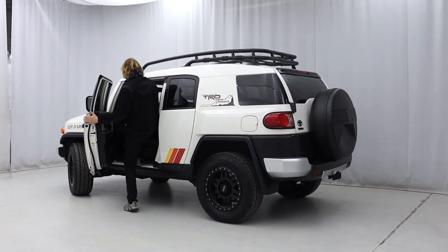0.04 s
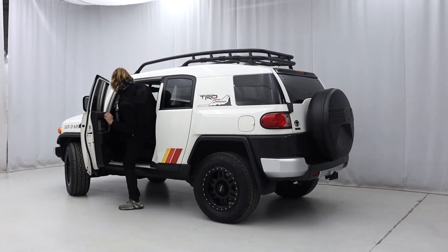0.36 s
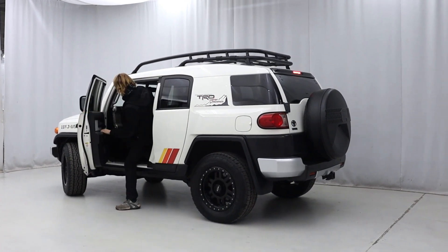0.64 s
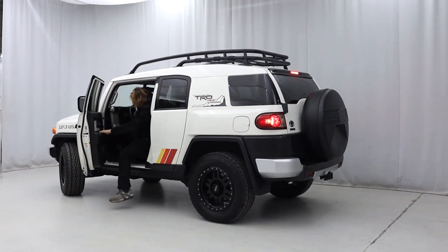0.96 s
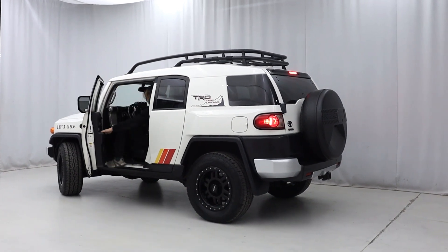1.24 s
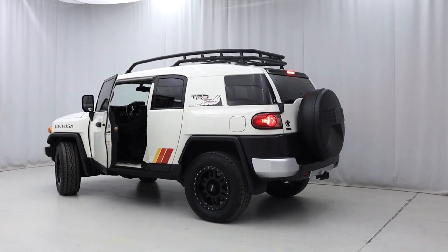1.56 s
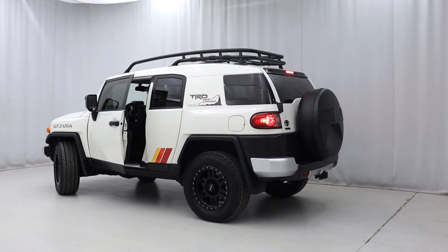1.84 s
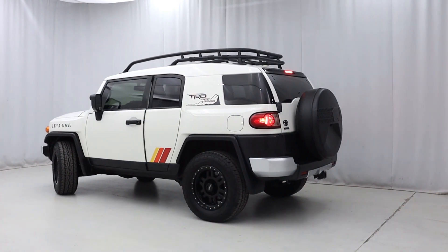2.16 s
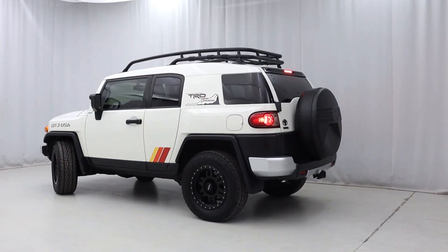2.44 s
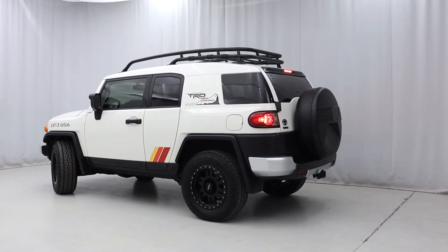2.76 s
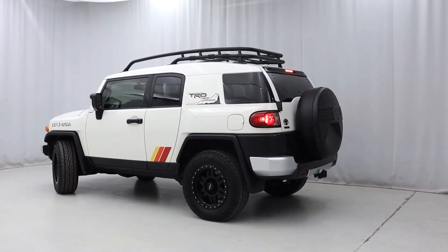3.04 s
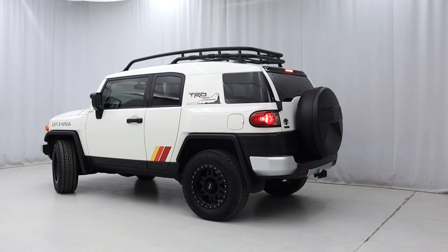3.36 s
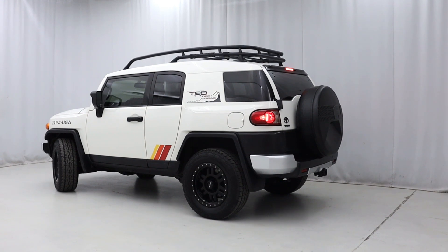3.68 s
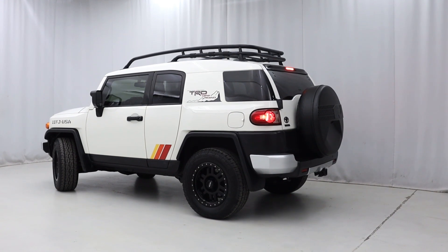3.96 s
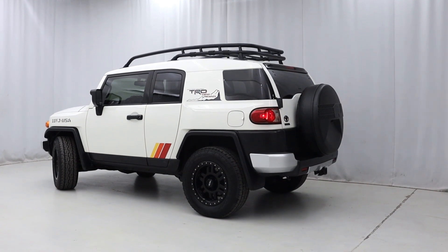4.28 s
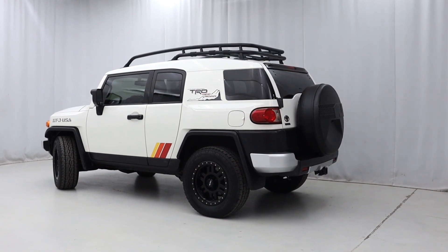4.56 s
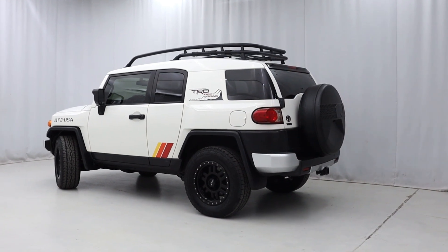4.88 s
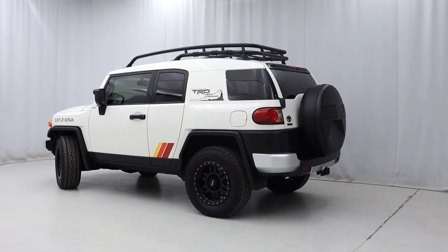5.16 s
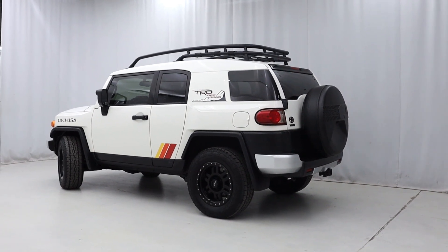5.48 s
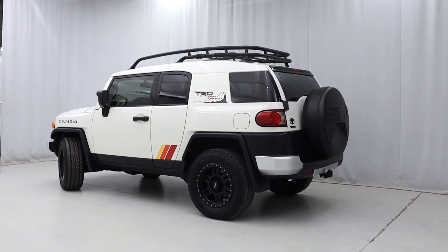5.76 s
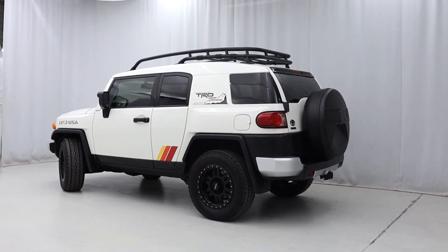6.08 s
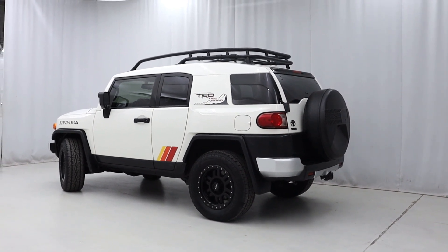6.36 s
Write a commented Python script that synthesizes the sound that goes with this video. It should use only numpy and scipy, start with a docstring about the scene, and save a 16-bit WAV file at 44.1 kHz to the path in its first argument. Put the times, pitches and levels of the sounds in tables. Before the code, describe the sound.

An SUV door slams in a large hall, then the starter cranks and the engine catches, flares and settles into a fast idle.

```python
"""Ventilation rumbles in a large hall. A driver slides onto an SUV's seat, keys jingle, the door slams.
A solenoid clacks the pinion in; the starter's gears grind, slowed by each compression stroke.
The V6 catches with exhaust thumps and overruns the whirring freewheel; the pipe hoots at resonance
and the pinion is thrown out. The engine flares in clean tones, then settles to a fast cold idle
whose exhaust grows raspier as it takes up load."""
import sys
import numpy as np
from scipy import signal
from scipy.fft import rfft, irfft, next_fast_len
from scipy.io import wavfile

SR = 44100
rng = np.random.default_rng(int(sys.argv[2]) if len(sys.argv) > 2 else 0)


def wav_record(signal):
    """Record a signal, one row per channel, as 16-bit PCM in the file named by sys.argv[1]."""
    frames = np.transpose(np.atleast_2d(signal))
    bounded = np.clip(frames, -1, 1)
    # unit amplitude maps onto the largest positive 16-bit level
    quanta = np.round(bounded * 32767).astype(np.int16)
    wavfile.write(sys.argv[1], SR, quanta)


N = 283122
TIME = np.arange(N) / SR
HZ = np.maximum(np.fft.rfftfreq(next_fast_len(N + SR // 4, True), 1 / SR), 1)

# engine speed as the firing rate of one cylinder bank: time_s, rate_hz
BANK_RATE = [(3.63, 18.7), (3.7, 25.3), (3.8, 31.3), (3.88, 37), (3.96, 39.4), (4.06, 40.4), (4.3, 39.6),
             (4.65, 37.3), (5.98, 37.4), (6.2, 38.3)]
ENGAGE_S, CATCH_S, RELEASE_S = 2.886, 3.592, 3.9   # starter in, first firing, starter out


def from_db(db):
    """Decibels to gain."""
    return 10 ** (np.asarray(db) / 20)


def rms_one(x):
    """Scale to unit power."""
    return x / np.sqrt(np.mean(x ** 2) + 1e-20)


def fade(start_s, end_s):
    """Ramp from 0 to 1."""
    return np.clip((TIME - start_s) / max(end_s - start_s, 1e-3), 0, 1)


def since(start_s):
    """Seconds since a moment, 0 before it."""
    return np.maximum(TIME - start_s, 0)


def at_hz(points):
    """Read a table along log frequency."""
    hz, value = np.transpose(points)
    return np.interp(np.log(HZ), np.log(hz), value)


def filtered(x, gain):
    """Apply a gain per frequency."""
    return irfft(rfft(x, 2 * (len(HZ) - 1)) * gain)[..., :N]


def colour(x, spectrum):
    """Shape x by rows of freq_hz, level_db, with steep skirts; rms 1."""
    skirts = np.minimum(1, np.minimum(HZ / spectrum[0][0], spectrum[-1][0] / HZ)) ** 4
    return rms_one(filtered(x, from_db(at_hz(spectrum)) * skirts))


def noise():
    """White noise."""
    return rng.standard_normal(N)


def drift(rate_hz):
    """Random wander; rms 1."""
    knots = rng.standard_normal(4000)
    return rms_one(np.interp(TIME * rate_hz, np.arange(len(knots)), knots))


def harmonic(cycles, multiple):
    """Sine at a multiple of a cycle count, in random phase."""
    return np.sin(2 * np.pi * (multiple * cycles + rng.random()))


def resonate(x, hz, width_hz):
    """One resonance, peak gain 1."""
    r = np.exp(-np.pi * width_hz / SR)
    poles = [1, -2 * r * np.cos(2 * np.pi * hz / SR), r * r]
    return signal.lfilter(np.array([1, 0, -1]) * (1 - r * r) / 2, poles, x + 1e-18)


def ticks(cycles, spread_db):
    """One click of uneven strength per cycle."""
    return np.diff(np.floor(cycles), prepend=0) * from_db(spread_db * rng.uniform(-1, 1, N))


def struck(times_s, levels_db, t60_s):
    """Envelope that jumps at each time and dies away."""
    clicks = np.zeros(N)
    clicks[(np.asarray(times_s) * SR).astype(int)] = from_db(levels_db)
    return signal.lfilter([1], [1, -from_db(-60 / (t60_s * SR))], clicks + 1e-18)


def diffuse(mid, side):
    """Two unrelated signals as sound from all around: left and right alike in the bass only."""
    # left-right likeness: freq_hz, correlation
    likeness = [(100, 0.99), (250, 0.97), (500, 0.83), (1000, 0.33), (2000, 0), (15000, 0)]
    alike = np.clip(at_hz(likeness), -1, 1)
    common = filtered(mid, np.sqrt(1 + alike))
    opposed = filtered(side, np.sqrt(1 - alike)) * [[1], [-1]]
    return (common + opposed) / np.sqrt(2)


def hall(x, early_db, late_db, early_t60_s=0.091, late_t60_s=0.64, lag_samples=2.76, wall_hz=6000):
    """Direct sound from slightly left, quick floor and body reflections, a dull long tail."""
    early = [rms_one(noise() * from_db(-60 * TIME / early_t60_s)) for ear in "LR"]
    late = [rms_one(noise() * from_db(-60 * TIME / late_t60_s) * fade(.01, .03)) for ear in "LR"]
    late = signal.lfilter(*signal.butter(1, wall_hz, fs=SR), late)
    echoes = diffuse(*(from_db(early_db) * np.array(early) + from_db(late_db) * late))
    direct = np.array([x, filtered(x, np.exp(-2j * np.pi * HZ / SR * lag_samples))])
    return direct + signal.fftconvolve([x], echoes[:, :SR] / np.sqrt(N), axes=1)[:, :N]


def ventilation(hiss_db=-57, hiss_fall_db_per_s=4, hiss_end_s=1.6):
    """Steady duct rumble with a wavering hum; a thin high hiss sinks, then cuts off."""
    # duct air and hiss spectra: freq_hz, level_db
    duct_spectrum = [(15, -43), (25, -33), (45, -6.5), (135, -1.5), (160, -5.5), (190, -5.5), (331, -2),
                     (401, -10), (431, -9), (576, -9.5), (848, -9.5), (957, -13.5), (1410, -15.5),
                     (3790, -28), (8000, -43.5), (10400, -70), (17600, -120)]
    hiss_spectrum = [(7000, -9), (9500, -0.5), (10600, 0), (11500, 2), (12300, -11), (15800, -13)]
    air = from_db(-33.5) * diffuse(colour(noise(), duct_spectrum), colour(noise(), duct_spectrum))
    hum = from_db(-40.5) * rms_one(resonate(noise(), hz=163.7, width_hz=8.9))
    hiss_gain = from_db(hiss_db - hiss_fall_db_per_s * TIME) * (1 - fade(hiss_end_s, hiss_end_s))
    hiss = hiss_gain * np.array([colour(noise(), hiss_spectrum) for ear in "LR"])
    return air + hum + hiss + from_db(-60) * rng.standard_normal((2, N))


def driver(jingle_s=(1.25, 1.56), touches_per_s=45, touch_db=-41):
    """Clothes slide over the seat, keys jingle at the ignition and trim is knocked."""
    # cloth and key spectra: freq_hz, level_db
    cloth_spectrum = [(2500, -5), (5000, 0), (7000, -8), (15000, -21)]
    key_spectrum = [(2350, -43), (4000, -3), (8020, 3), (8890, -1), (11100, 4), (12800, -3), (15100, 0),
                    (15800, -4)]
    # loudest key hits and trim knocks: start_s, relative_db
    key_hits = [(1.274, -38), (1.3543, -38), (1.3848, -34), (1.431, -24.5), (1.5255, -27), (1.5743, -35),
                (1.8442, -36), (1.9969, -36.5)]
    trim_knocks = [(1.528, -37), (1.572, -32), (1.851, -36.5), (1.998, -46)]
    touches_s = np.arange(*jingle_s, 1 / touches_per_s)
    jitter, spread = rng.standard_normal((100, 2))[:len(touches_s)].T
    touches = np.transpose([touches_s + 0.34 * jitter / touches_per_s, touch_db + 2.1 * spread])
    times_s, levels_db = np.vstack([key_hits, touches]).T
    jingle = from_db(3.1 * drift(250))   # keys on the ring touch several times
    keys = colour(noise(), key_spectrum) * jingle * struck(times_s, levels_db - 8.5, t60_s=0.054)
    trim_spectrum = [(120, 10), (500, -8), (1500, -5), (4000, -14.5), (7000, -25)]
    knocks = colour(noise(), trim_spectrum) * struck(*np.transpose(trim_knocks), t60_s=0.056)
    sliding = fade(0.1, 0.17) * (1 - fade(0.29, .36))
    return from_db(-49.5) * sliding * colour(noise(), cloth_spectrum) + keys + knocks


def blows(rows, mismatch_db_per_part=16.5):
    """Soft blows thud in the low parts, hard ones clack and snap in the high parts."""
    # parts that a blow rings: low_hz, high_hz, t60_s
    parts = [(125, 277, 0.19), (380, 1270, 0.087), (1240, 4300, 0.08), (4460, 9700, 0.073)]
    times_s, blow_db, hardness = np.transpose(rows)
    out = 0
    for k, (low_hz, high_hz, t60_s) in enumerate(parts):
        level_db = blow_db - mismatch_db_per_part * np.abs(hardness * (len(parts) - 1) - k)
        band = signal.butter(2, [low_hz, high_hz], "band", fs=SR, output="sos")
        rattle = noise() * struck(times_s, level_db, t60_s) * np.sqrt(SR / 2 / (high_hz - low_hz))
        out = out + from_db(-6.5) * signal.sosfilt(band, rattle)
    return out


def door_slam(skin_db=-7, hard_loss_db=35):
    """Latch, seal and frame are met in turn; the soft blows also ring the door skin."""
    # door contacts: start_s, level_db, hardness (0-1)
    contacts = [(2.2702, -9.5, 0.81), (2.2707, -14, 0.25), (2.283, -15, .35), (2.304, -5, 0.32),
                (2.312, -15, 0), (2.326, -11, 0.2), (2.334, -5.5, 0.69), (2.344, -13.5, 0.15),
                (2.384, -19.5, 0.08)]
    # skin modes: pitch_hz, width_hz, level_db
    skin_modes = [(133, 22, -3), (245, 34, 2)]
    age_s = TIME[:SR // 4]
    ring = sum(from_db(db) * np.exp(-np.pi * width_hz * age_s) * np.sin(2 * np.pi * hz * age_s)
               for hz, width_hz, db in skin_modes)
    out = blows(contacts)
    for start_s, blow_db, hardness in contacts:
        out[int(start_s * SR):][:len(ring)] += from_db(blow_db + skin_db - hard_loss_db * hardness) * ring
    return out


def solenoid(ring_db=-18, ring_t60_s=0.15):
    """The plunger throws the pinion in, later out, with clacks that ring the bell housing."""
    # plunger clacks: start_s, level_db, hardness (0-1)
    clacks = [(2.882, -19.5, 0.6), (2.889, -2.5, 0.83), (3.893, -20, .72)]
    # bell housing modes: pitch_hz, width_hz, level_db
    bell_modes = [(1550, 87, 2.5), (4290, 410, 3.5)]
    times_s, blow_db, _ = np.transpose(clacks)
    jolt = noise() * struck(times_s, blow_db + ring_db, ring_t60_s)
    ring = sum(from_db(db) * resonate(jolt, hz, width_hz) * np.sqrt(SR / (np.pi * width_hz))
               for hz, width_hz, db in bell_modes)
    return blows(clacks) + ring


def starter_load(jerk_db=-22, stroke_fall_db=14.5, gears_db=-31, unload_db_per_s=49):
    """Gear force: a jerk from rest, a swell per compression, unloading once the engine fires."""
    # compression strokes: start_s, rise_s, hold_s, level_db
    strokes = [(2.935, 0.051, .025, -20.5), (3.044, 0.042, 0.054, -18), (3.252, .008, .038, -16.5),
               (3.382, .006, .034, -17), (3.489, .005, .03, -17.5)]
    jerk = struck([ENGAGE_S], [jerk_db], t60_s=0.6)
    stroke_power = 0
    for start_s, rise_s, hold_s, db in strokes:
        lengths_past = since(start_s + rise_s + hold_s) / (rise_s + hold_s)
        stroke_power += (fade(start_s, start_s + rise_s) * from_db(db - stroke_fall_db * lengths_past)) ** 2
    engaged = fade(ENGAGE_S, ENGAGE_S + .01) * (1 - fade(RELEASE_S, RELEASE_S + 0.046))
    running = engaged * from_db(gears_db - unload_db_per_s * since(CATCH_S))
    return np.sqrt(jerk ** 2 + stroke_power + running ** 2)


def starter(free_mesh_hz=441.3, spin_up_s=0.03, sag_share=0.45, sag_lag_s=0.03, housing_db=-6):
    """Pinion teeth grind on the ring gear, ring the housing and groan as the engine leaves rest."""
    # grind spectrum: freq_hz, level_db
    grind_spectrum = [(180, -15), (280, -4.5), (335, 1), (385, -9.5), (432, -1), (563, -8), (759, -4),
                      (1230, -2), (1550, -4.5), (2420, -1), (3380, -5.5), (4480, -8.5), (8550, -20.5),
                      (15800, -37)]
    # starter and bell housing modes: pitch_hz, half_width_hz, level_db
    housing_modes = [(767, 10, 11.5), (960, 21, 3), (1540, 114, 4.5), (2100, 110, -3), (2350, 49, -10),
                     (3220, 26, -8), (3580, 53, -7), (4040, 28, -34), (4380, 310, -2.5), (5500, 390, -9)]
    # gear groan: mesh_multiple, level_db
    groan_tones = [(1, -17), (3, -4.5), (4, -12.5), (6, -9)]
    load = starter_load()
    # each compression slows the motor, a little late
    pole = np.exp(-1 / (sag_lag_s * SR))
    drag = signal.lfilter([1 - pole], [1, -pole], load / load.max())
    mesh_hz = free_mesh_hz * (1 - np.exp(-since(ENGAGE_S) / spin_up_s)) * (1 - sag_share * drag)
    mesh_cycles = np.cumsum(mesh_hz) / SR
    landings = np.cumsum(mesh_hz * np.exp(.4 * drift(600))) / SR   # backlash: teeth land early or late
    teeth = rms_one(ticks(landings, spread_db=3)) + 1.5 * noise()
    ring = sum(from_db(db) * resonate(teeth, hz, 2 * half_hz) for hz, half_hz, db in housing_modes)
    grind = rms_one(colour(teeth, grind_spectrum) + from_db(housing_db) * rms_one(ring))
    groan = sum(from_db(db) * (1 + .4 * drift(90)) * harmonic(mesh_cycles, k) for k, db in groan_tones)
    return load * (grind + (1 - fade(3.12, 3.22)) * groan)


def engine_load(start_s=3.99, time_constant_s=1.51):
    """Load on the cold engine, 0 to 1: quick at first, then levelling off."""
    return 1 - np.exp(-since(start_s) / time_constant_s)


def engine_bay(bank_cycles, base_db=-32.5, load_rise_db=9):
    """Valves and injectors tick through the rush of fan and belts."""
    # clatter spectrum: freq_hz, level_db
    clatter_spectrum = [(350, -23.5), (600, -1.5), (778, -5), (845, -10), (1040, -7), (1650, -8.5),
                        (1890, -11), (2200, -10.5), (2740, -18), (4670, -23.5), (7860, -34.5),
                        (15200, -43.5), (15800, -42)]
    valves = rms_one(ticks(bank_cycles * 8, spread_db=4))
    rush = noise() * (1 + 0.066 * np.cos(4 * np.pi * bank_cycles))
    gain = fade(3.1, 3.6) * from_db(base_db + load_rise_db * engine_load())
    return gain * colour(rush + 0.11 * valves, clatter_spectrum)


def freewheel(bank_cycles, teeth_per_cycle=88, fall_db_per_s=20, throw_out_db_per_s=239):
    """The engine overruns the starter: a surging, ringing whirr and a tooth whine that tracks speed."""
    # whirr spectrum: freq_hz, level_db
    whirr_spectrum = [(500, -1), (1200, -18), (2500, -2), (3600, 0), (4500, -1.5), (6000, -4.5),
                      (8500, -11), (15800, -20)]
    # freewheel modes: pitch_hz, width_hz, level_db
    modes = [(1516, 100, -7), (2460, 31, 3), (2790, 43, 1.5), (3130, 160, 0), (4340, 300, -3)]
    slip = noise() * (1 + 0.15 * np.cos(4 * np.pi * bank_cycles))
    ring = rms_one(sum(from_db(db) * resonate(slip, hz, width_hz) for hz, width_hz, db in modes))
    whine = fade(CATCH_S, 3.75) * drift(400) * np.sin(2 * np.pi * teeth_per_cycle * bank_cycles)
    whirr = colour(slip, whirr_spectrum) + from_db(-3) * ring + from_db(-1.5) * whine
    level_db = -26 - fall_db_per_s * since(CATCH_S) - throw_out_db_per_s * since(RELEASE_S)
    surge_db = 2 * drift(30)
    return fade(3.5, 3.599) * from_db(level_db + surge_db) * whirr


def exhaust_thumps(pulses, catch_db=-7, hold_s=0.14, fall_db_per_s=78):
    """Firings ring the pipe; the muffler rounds off the strongest and passes only the bass."""
    # pipe modes: pitch_hz, width_hz, level_db
    pipe_modes = [(110.2, 24.7, -1.5), (201.6, 41, -7), (256.6, 48, -7.5), (325, 36, -9)]
    pipe = sum((-1) ** k * from_db(db) * resonate(pulses, hz, width_hz)
               for k, (hz, width_hz, db) in enumerate(pipe_modes))
    muffler = signal.butter(2, [58, 350], "band", fs=SR, output="sos")
    # the first firings burn a full charge of air
    full_charge = from_db(catch_db - fall_db_per_s * since(CATCH_S + hold_s))
    idle_charge = from_db(-30 + 11.5 * engine_load())
    return (full_charge + idle_charge) * signal.sosfilt(muffler, np.tanh(.55 * rms_one(pipe)))


def exhaust(bank_cycles, flare_s=(3.78, 3.91), settle_s=(4.24, 4.54)):
    """Uneven firings thump, merge into clean tones in the flare and rasp at idle; returns bass, rasp."""
    # cylinder strengths in firing order: level_db
    cylinder_db = [3.65, 6.4, 5.6, 4.8, 2.9, 6.3]
    # exhaust tones: bank_multiple, flare_db, idle_db
    tone_levels = [(1, -45.5, -24), (2, -11.5, -15.5), (3, 0, -5), (4, -1, -9), (5, -4, -21.5),
                   (7, -7, -10), (8, -13.5, -16)]
    # gas rasp spectrum: freq_hz, level_db
    rasp_spectrum = [(90, -42), (130, 3.5), (190, 1), (245, 0), (280, 4.5), (360, 3), (400, -2), (455, -2),
                     (520, -11.5), (640, -17.5), (850, -30.5), (1500, -60)]
    load, idling = engine_load(), fade(*settle_s)
    firings = 2 * bank_cycles
    strength = from_db(cylinder_db)[firings.astype(int) % len(cylinder_db)]
    pulses = ticks(firings, spread_db=2.5) * strength
    tones = 0
    for k, flare_db, idle_db in tone_levels:
        level_db = flare_db + (idle_db - flare_db) * idling + 1.97 * drift(16)
        tones += from_db(level_db) * harmonic(bank_cycles, k)
    tones *= fade(*flare_s) * from_db(-16 * (1 - idling) + (-23.5 + 7.5 * load) * idling)
    # gas rushes out in a puff after each firing, swelling unevenly
    puffs = strength * (1.06 + np.exp(-4 * (firings % 1))) * from_db(0.96 * drift(22))
    rasp = colour(noise() * puffs + 0.28 * rms_one(pulses), rasp_spectrum) * from_db(-26 + 11.5 * load)
    running = fade(CATCH_S - .015, CATCH_S + 0.032)
    return running * (exhaust_thumps(pulses) + tones), running * rasp


def pipe_boom(bank_hz, bank_cycles, resonance_hz=118.5, width_hz=9.6, level_db=-11.5):
    """A short rising hoot as the fourth exhaust tone sweeps through the pipe's lowest resonance."""
    detuning = (4 * bank_hz - resonance_hz) / width_hz
    return from_db(level_db) * np.exp(-detuning ** 2) * np.sin(8 * np.pi * bank_cycles)


def scene():
    """All sources in the hall; one speed curve drives the engine sounds."""
    bank_hz = np.interp(TIME, *np.transpose(BANK_RATE))
    firing = TIME > CATCH_S
    bank_cycles = firing * (.5 + np.cumsum(bank_hz * firing) / SR)
    bass, rasp = exhaust(bank_cycles)
    hits = hall(door_slam() + solenoid() + driver(), early_db=-2, late_db=-11)
    # starter and engine bay radiate from many panels, so much of their sound comes from all around
    facing, *around = [starter() + freewheel(bank_cycles) for panel in range(3)]
    cranking = hall(facing, early_db=-10, late_db=-12) + from_db(-4.5) * diffuse(*around)
    bay = from_db(-3.5) * hall(engine_bay(bank_cycles), early_db=-14, late_db=-14)
    bay += from_db(-2) * diffuse(engine_bay(bank_cycles), engine_bay(bank_cycles))
    tailpipe = bass + hall(rasp, early_db=-10, late_db=-7) + pipe_boom(bank_hz, bank_cycles)
    return ventilation() + hits + cranking + bay + tailpipe


def record(dry, ceiling=1.5, stopband_hz=16300):
    """Each microphone adds its colour, peaks are rounded and the top is cut."""
    # microphone balance: freq_hz, left_minus_right_db
    balance = [(60, 0), (130, 0.6), (300, 0.85), (450, 1.5), (610, -0.5), (780, 0.5), (1200, -2.5),
               (1720, -5.5), (2150, -1), (2600, -2.5), (3400, -1.5), (4150, 1), (5800, -2), (9500, 0.1),
               (15000, -.5)]
    heard = filtered(dry, from_db(at_hz(balance) * [[.5], [-.5]]))
    lowpass = signal.cheby2(16, 50, stopband_hz, fs=SR, output="sos")
    return signal.sosfiltfilt(lowpass, ceiling * np.tanh(heard / ceiling))


dry = scene()
out = record(dry)
wav_record(out)
```